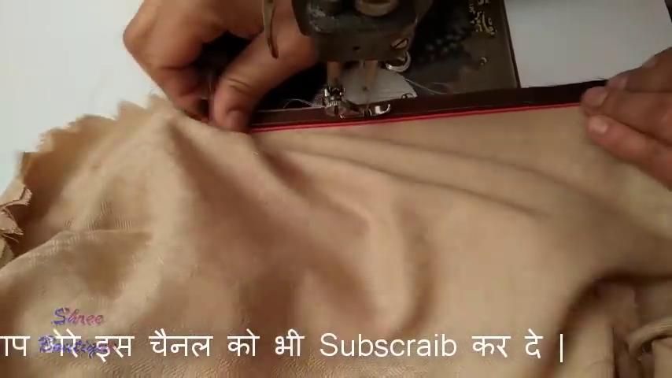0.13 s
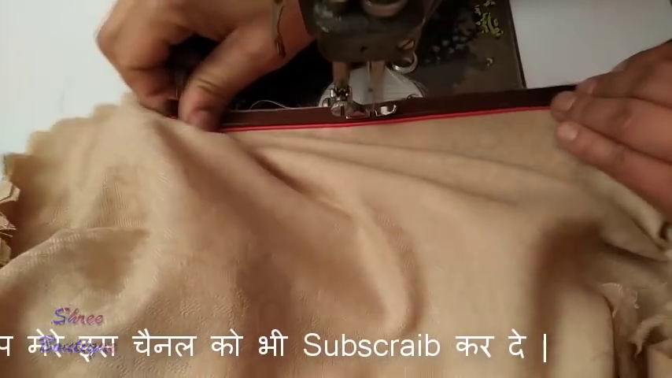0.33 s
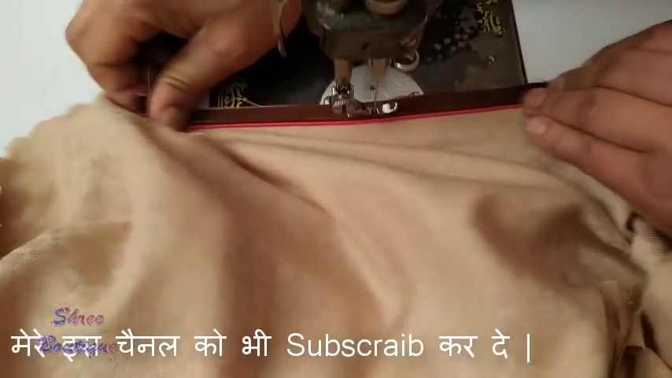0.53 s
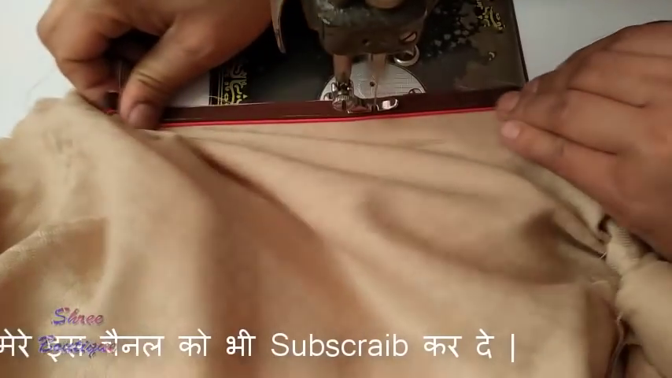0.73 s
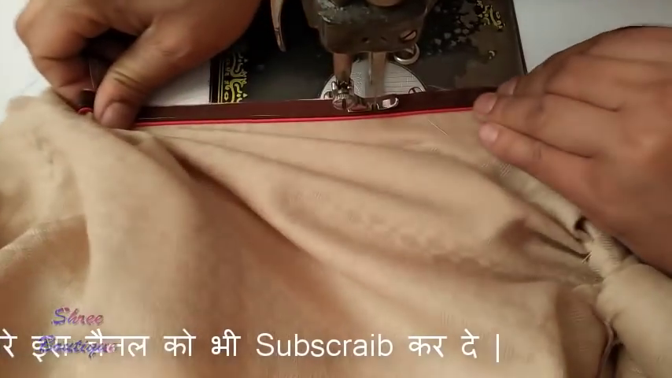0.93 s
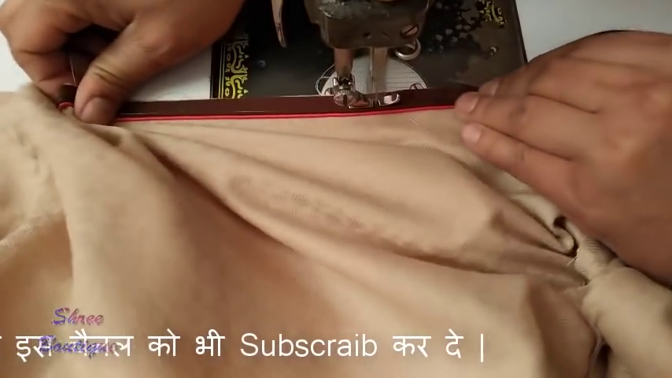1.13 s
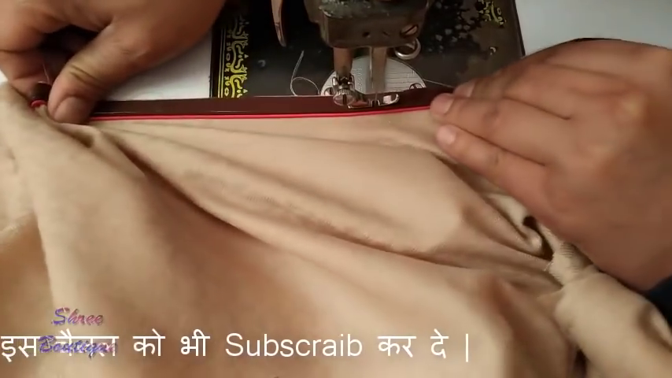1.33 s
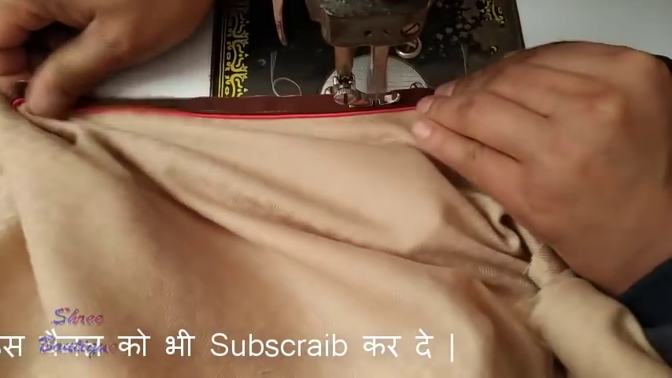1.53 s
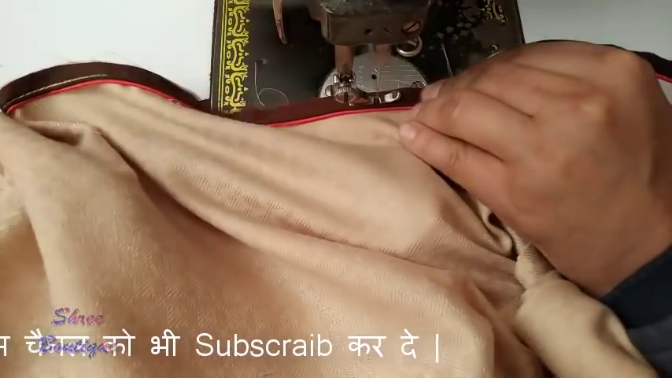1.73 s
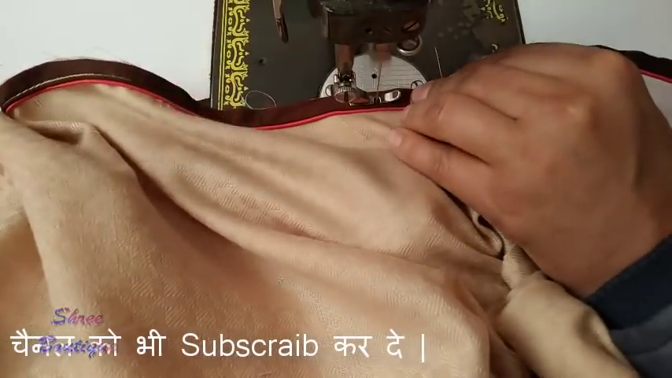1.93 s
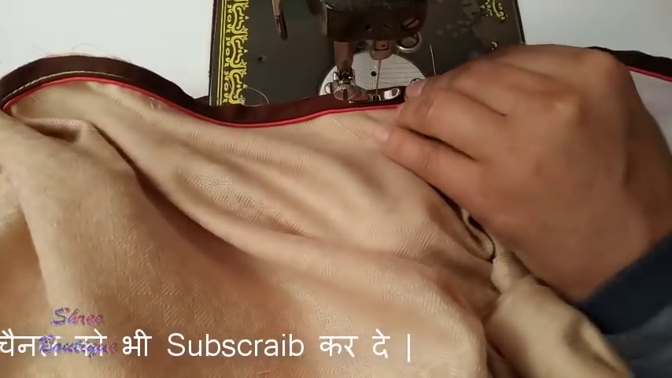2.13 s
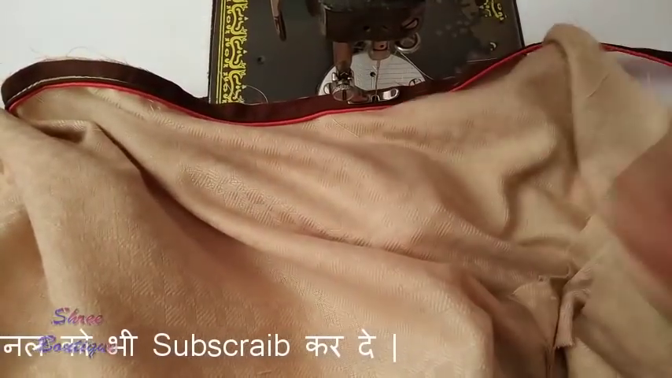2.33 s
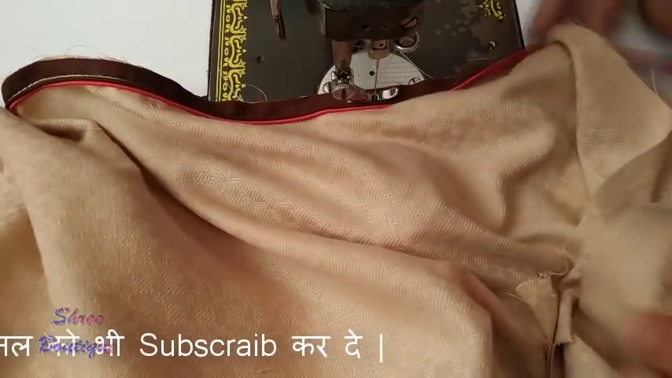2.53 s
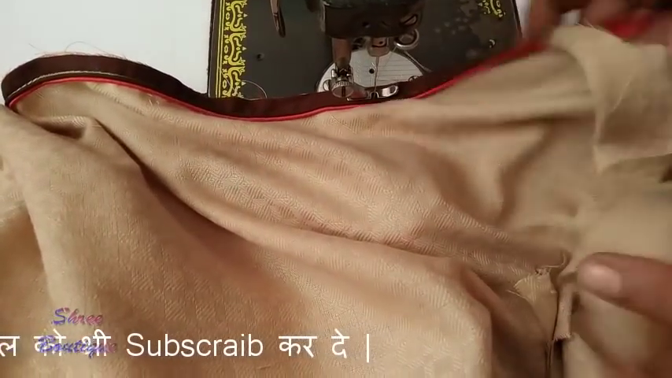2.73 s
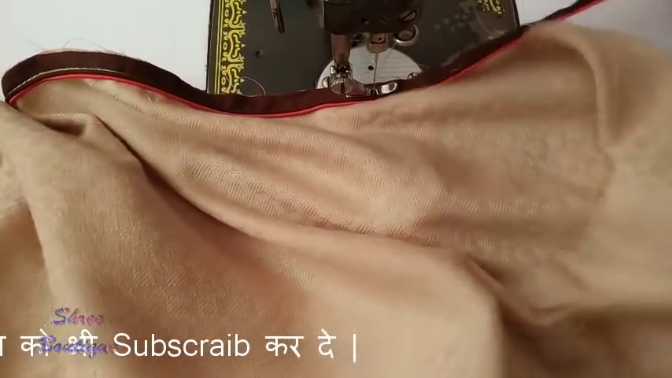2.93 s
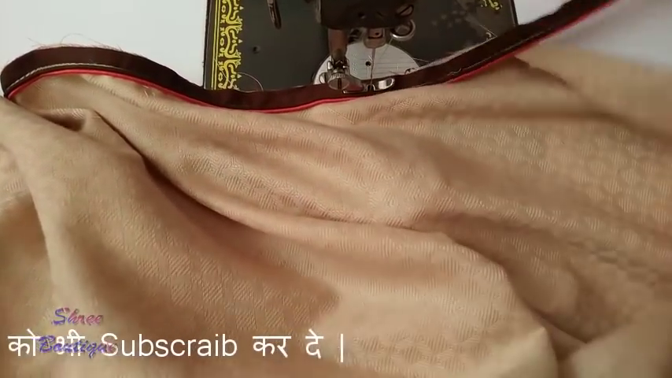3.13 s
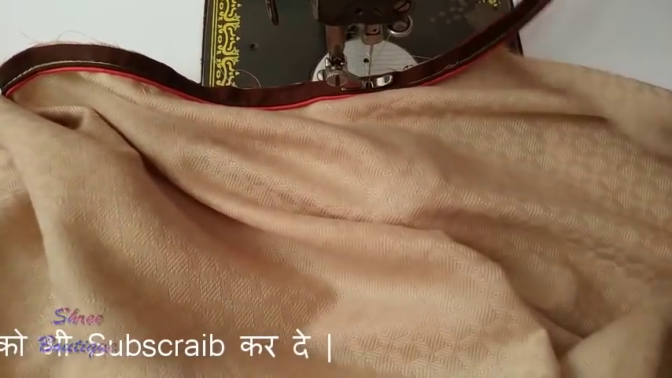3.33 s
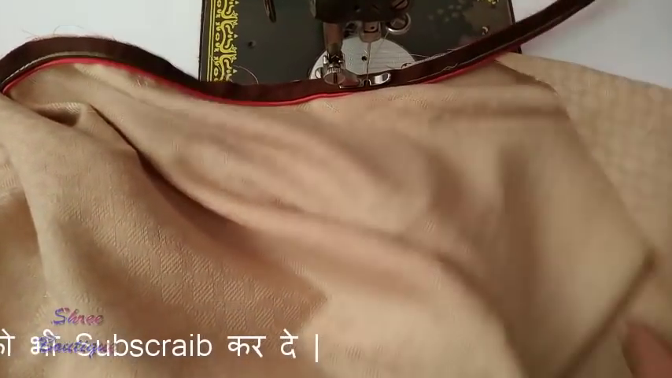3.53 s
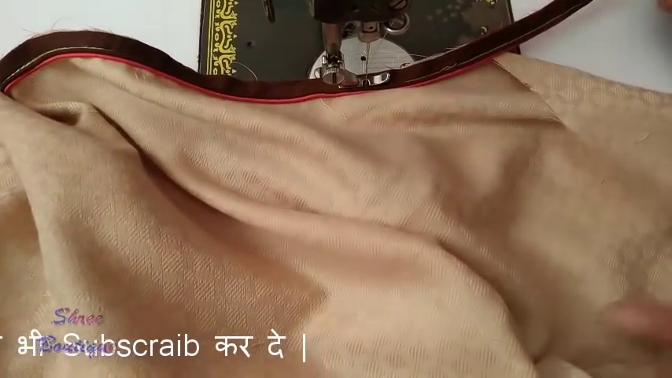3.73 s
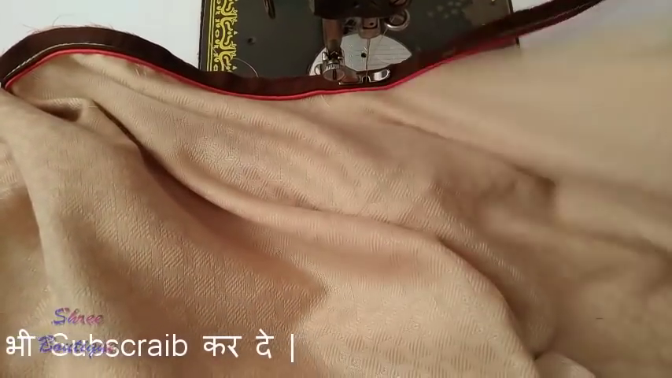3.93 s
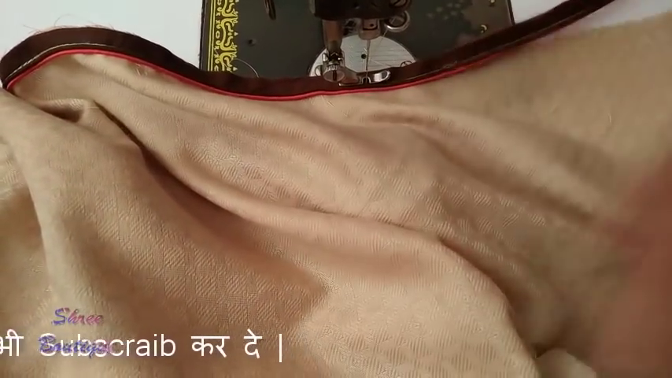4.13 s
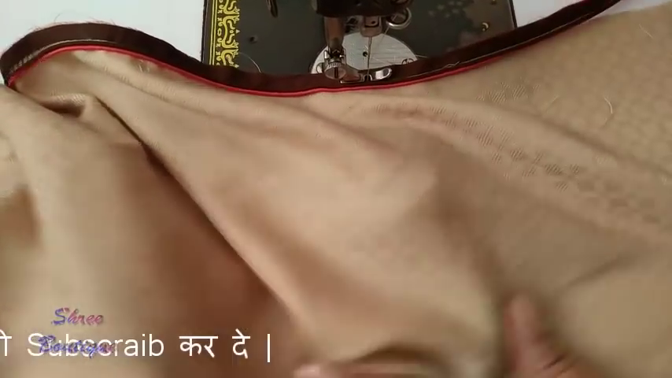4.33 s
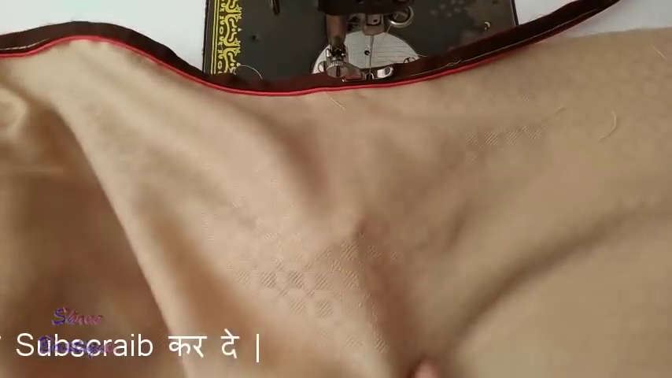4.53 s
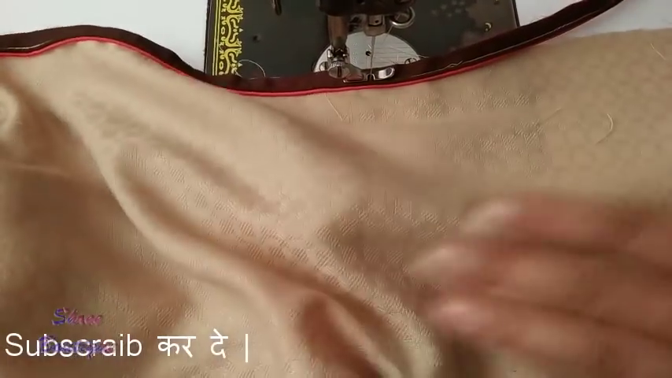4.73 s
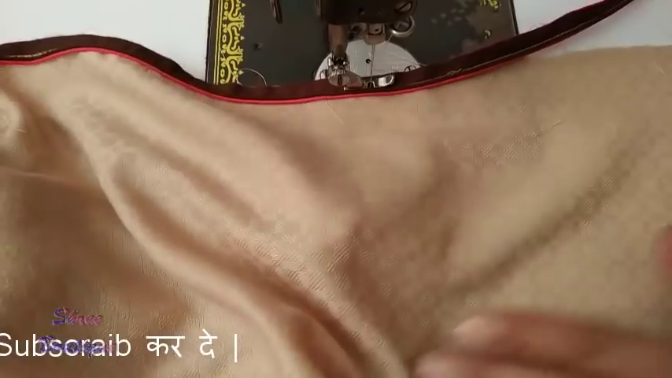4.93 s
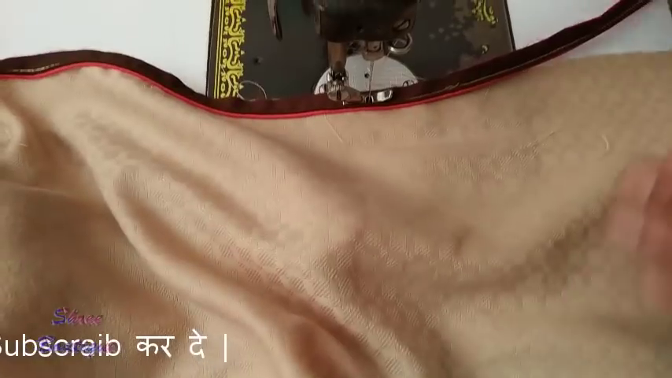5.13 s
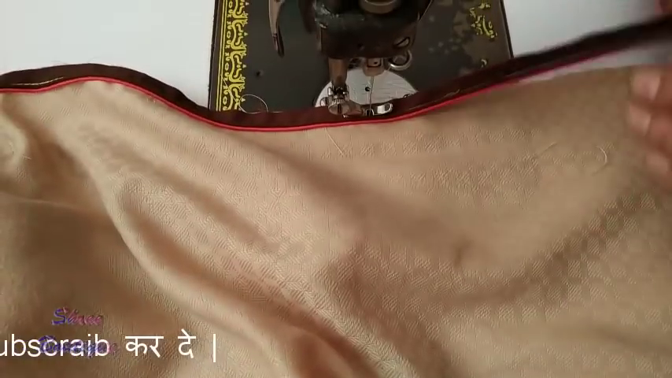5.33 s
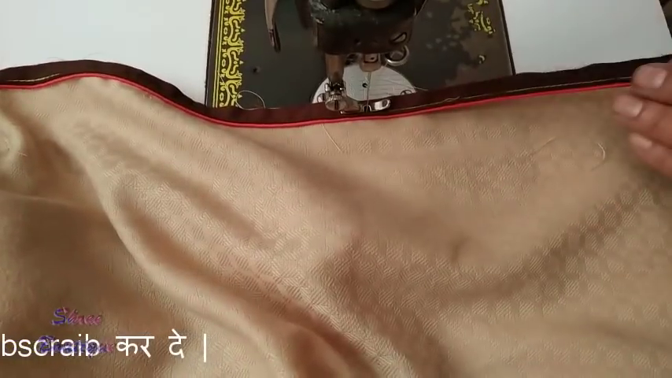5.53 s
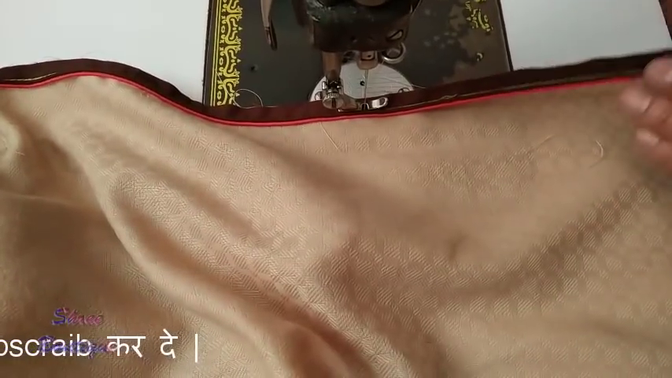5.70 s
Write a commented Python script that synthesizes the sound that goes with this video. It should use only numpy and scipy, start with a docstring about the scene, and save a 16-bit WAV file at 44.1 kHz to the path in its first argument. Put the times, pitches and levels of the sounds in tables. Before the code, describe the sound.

A sewing machine is already running fast on a wooden table in a small room, heard close in stereo. For the first 0.7 seconds, heavy wooden thuds come at over twenty per second, peaking near 0.4, beneath a broad whirr and steel rattle. From about 0.75 the drive eases: thuds give way to sharp, bright clicks and looser chatter as the speed sags, recovers briefly and falls. Between 1.55 and 2.1 it runs down in irregular metallic clacks, with two strong thuds near 1.7, and is still by 2.4. Then it is much quieter. A hand knocks at 2.5, cloth rustles softly, and fabric swishes swell around 3.5, 4.0, 4.5, 4.9 and 5.5. Table knocks fall at 4.35 and 4.9, the strongest at 5.24. Tiny steel tinks and a barely audible low-pitched hoot, mostly around 3.1-3.6 and 4.7-5.4, sit over faint room air.

```python
"""A sewing machine clatters at speed on a wooden table in a small room, coasts and stops, close to two microphone ports.
One shaft speed times the driven thuds, feed knocks, regular steel strikes and sway; blows ring decaying modes.
Whirr, rattle and clicks are shaped noise and ringing steel.
Afterwards cloth drags as swelling noise, hands knock the table, and a faint tone hoots far away."""
import sys
import numpy as np
from scipy import signal
from scipy.io import wavfile
from scipy.ndimage import uniform_filter1d

SR = 44100
rng = np.random.default_rng(int(sys.argv[2]) if len(sys.argv) > 2 else 0)


def unload_wav(signal):
    """Save mono or channel-first audio to the path in sys.argv[1] as 16-bit WAV at rate SR, clipped to [-1, 1]."""
    wavfile.write(
        sys.argv[1],
        SR,
        np.round(np.clip(np.atleast_2d(signal).T, -1, 1) * 32767).astype(np.int16),
    )


N = 258646
T = np.arange(N) / SR
FLAT = ((1, 0), (2, 0))
STEEL_GAP_S = .00014  # steel sound reaches the left port later


def gain_of(db):
    """Turns dB into amplitude."""
    return 10 ** (np.asarray(db) / 20)


def evened(x):
    """Scales a signal to rms 1."""
    return x / np.sqrt(np.mean(x ** 2) + 1e-20)


def read(points, hz):
    """Reads a spectrum table along a log frequency axis."""
    f, value = np.transpose(points)
    return np.interp(np.log(hz + 1), np.log(f + 1), value)


def curves(rows):
    """Draws each column of a time table as a curve over every sample."""
    s, *columns = np.transpose(rows)
    return [np.interp(T, s, c) for c in columns]


def train(s, db):
    """Places single samples of the given levels at the given times."""
    out = np.zeros(N)
    places = np.clip(np.round(np.asarray(s) * SR).astype(int), 0, N - 1)
    np.add.at(out, places, gain_of(db))
    return out


def fading(x, t60):
    """An envelope that jumps at each sample of x and decays by 60 dB in t60 seconds."""
    return signal.lfilter([1], [1, -1000 ** (-1 / (t60 * SR))], x)


def decaying(hz, db, t60, t):
    """One struck mode: a sine that decays by 60 dB in t60 seconds."""
    return gain_of(db - 60 * t / t60) * np.sin(2 * np.pi * hz * t)


# How alike diffuse sound is at the two ports: (frequency [Hz], likeness [-1 to 1])
PORT_LIKENESS = [(60, 0.56), (240, 1), (950, 0.32), (3770, -0.21), (15000, -0.68)]


def noise(spectrum, patchy_db, tilt=FLAT, direct=0., lag_s=0.):
    """Two-port noise of rms 1 with drifting patches; direct is the least likeness, lag_s delays the left port."""
    frames, hz = N // 256 + 5, np.fft.rfftfreq(1024, 1 / SR)
    a, b, c, d, patches = rng.standard_normal((frames, 513, 5)).T
    patches = uniform_filter1d(patches, size=12, axis=0)  # neighbouring frequencies move together
    patches = evened(uniform_filter1d(patches, size=8, axis=1))  # and drift over time
    same = np.clip(np.maximum(read(PORT_LIKENESS, hz), direct), 0, 1)[:, None]
    side = gain_of(read(tilt, hz) / 2)[:, None]
    shared, other = a + 1j * b, c + 1j * d
    lead = np.exp(2j * np.pi * hz * lag_s)[:, None]
    right = same * lead * shared + np.sqrt(1 - same ** 2) * other
    ports = np.array([shared * side, right / side])
    ports *= gain_of(read(spectrum, hz)[:, None] + patchy_db * patches)
    return evened(signal.istft(ports, nperseg=1024, noverlap=768)[1][:, :N])


# Still air in the room: (frequency [Hz], relative density [dB per Hz])
AIR_SPECTRUM = [(12, -35.5), (20, 6), (59, -18.5), (123, 1.5), (537, -12), (1640, -18), (2170, -12.5),
                (3110, -19.5), (7390, -22), (9770, -19), (15700, -40)]
AIR_DB = -61.5


def still_air():
    """Steady background air: shaped noise with slow patches."""
    return gain_of(AIR_DB) * noise(AIR_SPECTRUM, 1.8)


def room(x):
    """A short diffuse tail, alike at both ports in the bass."""
    t = T[:SR // 2]
    spectrum = [(80, -11), (220, -10), (400, 2), (16000, 0)]
    tail = noise(spectrum, 0)[:, :len(t)] * gain_of(-60 * t / 0.26)
    tail[:, :150] = 0  # gap before the first reflections
    return signal.fftconvolve(x[None], tail / np.linalg.norm(tail[0]), axes=1)[:, :N]


# Far tone: (time of peak [s], level [dB])
HOOT_SWELLS = [(2.38, -72), (3.09, -67), (3.28, -69), (3.48, -70), (3.63, -73), (4.74, -71), (5.16, -71),
               (5.44, -71)]
HOOT_HZ, HOOT_S = 810, .14


def hoots():
    """Soft swells around one pitch: a sine blended with narrow-band breath."""
    breath = signal.lfilter(*signal.iirpeak(HOOT_HZ, HOOT_HZ / 30, SR), rng.standard_normal(N))
    tone = evened(evened(breath) + 1.4 * np.sin(2 * np.pi * HOOT_HZ * T))
    return tone * sum(gain_of(db) * np.exp(-((T - s) / (HOOT_S / 2)) ** 4) for s, db in HOOT_SWELLS)


# Fine cloth rustle: (frequency [Hz], relative density [dB per Hz])
RUSTLE_SPECTRUM = [(290, -40), (500, -22), (828, -16.5), (2180, -12.5), (3500, -15), (4230, -9.5),
                   (7740, -6.5), (9340, 2), (10800, -2.5), (15700, -14)]
# Cloth dragged over the table:
# (time of peak [s], rise [s], fall [s], rustle level [dB], low rub level [dB])
CLOTH_DRAGS = [(2.3, 0.17, 0.44, -66, -49.5), (2.62, 0.36, 1, -53.5, -79), (2.9, 0.5, 0.73, -56.5, -62),
               (3.529, 0.098, 0.27, -49, -66), (3.72, 0.13, 0.034, -61.5, -77),
               (3.98, 0.15, 0.17, -47.5, -47.5), (4.14, 0.08, 0.1, -47.5, -52.5),
               (4.36, 0.19, 0.35, -59.5, -51), (4.48, 0.23, 0.33, -44, -62),
               (4.907, 0.032, 0.21, -44.5, -43.5), (5.47, 0.5, 0.52, -52, -58),
               (5.86, 0.27, 0.082, -50.5, -67.5)]
DRAG_DROP_DB = 21  # fall from the peak over one rise before or one fall after
RUB_PATCHY_DB, RUSTLE_PATCHY_DB = 2.5, 1.8


def cloth():
    """Friction swells: fine rustle with small crackles, and a low rub through the wood."""
    swells = [gain_of(-DRAG_DROP_DB * np.maximum((s - T) / rise, (T - s) / fall))
              for s, rise, fall, *_ in CLOTH_DRAGS]
    rustle, drag = gain_of(np.transpose(CLOTH_DRAGS)[3:]) @ swells
    snaps = rng.exponential(1, N) * (rng.random(N) < 220 / SR)  # about 220 a second
    crackle = evened(1 + 0.18 * fading(snaps, 0.018))
    rub_spectrum = [(8, 3.0), (30, -12.5), (60, -13.0), (120, -13.0), (20000, -50.5)]
    rub = noise(rub_spectrum, RUB_PATCHY_DB)
    return rustle * crackle * noise(RUSTLE_SPECTRUM, RUSTLE_PATCHY_DB) + drag * rub


# Grit of a hard click: (frequency [Hz], relative density [dB per Hz])
CLICK_SPECTRUM = [(470, -57), (800, -31.5), (1370, -28.5), (2040, -9), (3570, -12), (5870, -11.5),
                  (7620, -11), (8530, -7), (9420, -2), (15700, -20.5)]


def click_grit(patchy_db, **ports):
    """The bright noise inside a hard, short contact."""
    return noise(CLICK_SPECTRUM, patchy_db, **ports)


# Modes of table and machine bed: (frequency [Hz], t60 [s], relative level under a stitch thud [dB],
# under running vibration [dB], under a hand [dB])
WOOD_MODES = [(70, .25, -12, -18, -24), (107, .22, -11, -13, -16), (143, .25, .5, -14, -14),
              (155, .34, -5.5, -17, -1), (166, .25, -3, -18, -2), (185, .1, -9, -14, -8),
              (204, .32, -3.5, -17, -12), (266, .12, -9, -4, -16), (292, .13, -8, 1, -14),
              (318, .12, -9, -6, -9), (343, .17, -18, -6, -4), (398, .1, -11, 1, 0),
              (450, .11, -24, -10, -7), (530, .1, -15, -17, -11), (675, .1, -17, -16, -6),
              (845, .07, -20, -12, -22), (985, .06, -19, -13, -11)]
THUD, VIBRATION, HAND = 2, 3, 4  # level columns
RADIATES_HZ = 68  # the table radiates little below this


def ring(column, lo_hz, hi_hz, contact_s):
    """The table's modes answer one blow, peak 1; a longer contact sounds duller and the low end is thinned."""
    t = T[:SR // 2]
    out = sum(decaying(m[0], m[column], m[1], t) for m in WOOD_MODES if lo_hz < m[0] < hi_hz)
    out = np.convolve(out, np.hanning(int(max(contact_s, 0) * SR) + 3))[:len(t)]
    out = signal.lfilter(*signal.butter(2, RADIATES_HZ, "high", fs=SR), out)
    return out / abs(out).max()


def shaken(kernel, per_s, spread_db):
    """Random blows of uneven size and either sign ring the table; rms 1."""
    size = gain_of(spread_db * np.minimum(rng.exponential(1, N), 4))
    blows = size * (rng.random(N) < per_s / SR) * rng.choice([-1., 1.], N)
    return evened(signal.oaconvolve(blows, kernel)[:N])


# Hands on the table: (time [s], level [dB], relative level of upper modes [dB],
# relative level of nail tick [dB], contact [s], settling [s])
HAND_KNOCKS = [(2.488, -33.5, -4, -24, .002, .012), (2.555, -53, 6, -18, .004, .04),
               (2.68, -51, 4, -33, .0023, .05), (3.47, -46, -22, -40, .004, .02),
               (3.661, -45.5, -9, -40, .0015, .004), (3.917, -49, -12, -40, .0034, .006),
               (3.99, -53, 3, -33, .004, .02), (4.349, -35.5, -8, -40, .0015, .005),
               (4.4, -50, -3, -40, .001, .027), (4.465, -46, -9, -23, .0014, .06),
               (4.8985, -34.5, -4, -22, .003, .002), (4.9055, -34, -2, -14, .0012, .003),
               (5.238, -26, -4, -11, .002, .002), (5.438, -53, -1, -2, .001, .006),
               (5.752, -53, -3, 2, .001, .006)]
AFTER_DB = -14  # small blows while a hand settles
TICK_PATCHY_DB = 1.5


def hands():
    """Each hand rings low and upper wood modes, then settles in small random blows one about every millisecond."""
    out = np.zeros(N)
    for s, db, upper_db, _, contact_s, settle_s in HAND_KNOCKS:
        low = ring(HAND, 130, 230, contact_s)
        blow = low + gain_of(upper_db) * ring(HAND, 230, SR, contact_s / 2)
        after = gain_of(AFTER_DB) * rng.standard_normal(80) * (np.arange(80) < settle_s * 1000)
        spaced = np.kron(after, np.eye(1, SR // 1000)[0])
        blow = blow + signal.oaconvolve(blow, spaced)[:len(blow)]
        part = out[round(s * SR):][:len(blow)]
        part += gain_of(db) * blow[:len(part)]
    return out


def nail_ticks():
    """Nails on the table: a short bright snap and a softer, longer noise tail."""
    s, db, _, tick_db, *_ = np.transpose(HAND_KNOCKS)
    nails = train(s, db + tick_db)
    snap, tail = fading(nails, .005), gain_of(-10) * fading(nails, .13)
    tail_spectrum = [(150, -25), (600, 10), (1200, 6.0), (4000, -3.0), (9000, -8), (16000, -20)]
    return snap * click_grit(0, direct=0.7) + tail * noise(tail_spectrum, TICK_PATCHY_DB)


# A small steel part tinks as the cloth tugs it: (time [s], level [dB])
TINK_BLOWS = [(2.3341, -47.5), (2.6145, -53), (2.626, -47), (3.2395, -54), (5.3438, -51)]
TINK_HZ, TINK_T60_S = 2090, 0.017


def tinks():
    """One short steel mode, struck lightly."""
    mode = decaying(TINK_HZ, 0, TINK_T60_S, T[:4000])
    return signal.oaconvolve(train(*np.transpose(TINK_BLOWS)), mode)[:N]


# Running machine: (time [s], whirr level [dB], table vibration level [dB], clatter level [dB])
RUN_LEVELS = [(0, -21.5, -21, -36), (.2, -24.5, -20.5, -29), (.45, -26.5, -20.5, -32),
              (.8, -22.5, -23, -21.5), (1.15, -23, -25, -21.5), (1.35, -20.5, -25, -22),
              (1.55, -23, -27, -27), (1.7, -25.5, -28.5, -34), (2.05, -30.5, -32.5, -14),
              (2.13, -34.5, -44.5, -7), (2.22, -48, -55.5, -22), (2.3, -54, -65, -26),
              (2.45, -64, -71, -66)]


def running(x):
    """Fades to silence as the machine comes to a stand."""
    return x * np.clip((RUN_LEVELS[-1][0] - T) * 20, 0, 1)


# Main shaft, one turn a stitch: (time [s], speed [turns per second])
SHAFT_SPEED = [(0, 20.5), (.17, 21.21), (.35, 27.52), (.45, 25.23), (.63, 22.17), (.8, 21.77), (1.0, 13.81),
               (1.2, 18.74), (1.45, 17.52), (1.6, 13.91), (1.9, 9.55), (2.1, 7.05), (2.4, .85)]
FIRST_TURN = .435  # share of a turn at the start
DRIVEN_TO_S, EASED_S = .73, .95  # hard drive ends; shake has eased


def turns():
    """Turns of the main shaft counted up to every sample."""
    return FIRST_TURN + np.cumsum(curves(SHAFT_SPEED)[0]) / SR


def passes(share):
    """The moments at which the shaft passes a share of its turn."""
    s = T[1:][np.diff(np.floor(turns() - share)) > 0]
    return s[s < RUN_LEVELS[-1][0]]


def hard_drive():
    """One while driven hard, easing to zero as the machine runs freely."""
    return np.interp(T, [DRIVEN_TO_S, EASED_S], [1, 0])


SWAY_DRIVEN_DB, SWAY_FREE_DB, SWAY_TO_S = -35.5, -38, 1.73  # the sway starts to fade at the last


def sway():
    """The stand sways once a turn when driven, then twice: two sines locked to the shaft."""
    driven = hard_drive()
    out = driven * gain_of(SWAY_DRIVEN_DB) * np.sin(2 * np.pi * turns())
    out += (1 - driven) * gain_of(SWAY_FREE_DB) * np.sin(4 * np.pi * turns())
    return out * np.clip((SWAY_TO_S - T) * 10 + 1, 0, 1)


FEED_AT, FEED_DB = .42, 5.5  # share of the turn; level over the vibration
SHAKE_DRIVEN_DB, SHAKE_FREE_DB, BED_DRIVEN_DB = -6.5, -15, -2  # over the vibration


def vibration():
    """Dense random blows shake bed and table; the feed knocks the bed once a turn as the hard drive eases."""
    _, vibration_db, _ = curves(RUN_LEVELS)
    driven = hard_drive()
    bed, feed = ring(VIBRATION, 68, SR, .0002), passes(FEED_AT)
    knocks = (1 - driven) * train(feed, FEED_DB + 1.6 * rng.standard_normal(len(feed)))
    hum = gain_of(BED_DRIVEN_DB * driven) * shaken(bed, per_s=450, spread_db=2.5)
    hum += signal.oaconvolve(knocks, bed)[:N]
    shake_db = SHAKE_FREE_DB + (SHAKE_DRIVEN_DB - SHAKE_FREE_DB) * driven
    hum += gain_of(shake_db) * shaken(ring(THUD, 68, 230, .0009), per_s=600, spread_db=1)
    return running(gain_of(vibration_db) * hum)


# Looser thuds as the machine runs down: (time [s], peak level [dB])
LOOSE_THUDS = [(.7523, -13.5), (1.6985, -10.5), (1.7332, -12), (1.829, -24), (2.05, -26)]
THUD_DB, THUD_SPREAD_DB = -5.2, .6


def thuds():
    """A blow at the top of each driven turn, then looser ones, rings the wood."""
    tops = passes(0)[passes(0) < DRIVEN_TO_S]
    blows = train(tops, THUD_DB + THUD_SPREAD_DB * rng.standard_normal(len(tops)))
    blows += train(*np.transpose(LOOSE_THUDS))
    return signal.oaconvolve(blows, ring(THUD, 68, SR, .0007))[:N]


# Where the machine stands: (frequency [Hz], left minus right [dB])
MACHINE_TILT = [(800, 0), (2400, -5.5), (5000, 4), (9000, 2), (13000, 0.5)]


def rattle(hits):
    """Covers and links rattle as hard as the table vibrates, with a burst at each steel hit."""
    _, vibration_db, _ = curves(RUN_LEVELS)
    spectrum = [(400, -23.0), (700, -6.5), (950, -1.5), (1400, -12.0), (2500, -12.0), (5000, -45.5)]
    bursts = 1 + 2.2 * fading(hits, 0.022)
    return running(gain_of(vibration_db - 13) * bursts * noise(spectrum, 1.9, MACHINE_TILT))


# Shaft whirr: (frequency [Hz], relative density [dB per Hz])
WHIRR_SPECTRUM = [(290, -41.5), (500, -5), (1120, -17.5), (1390, -3.5), (1560, -11.5), (2590, -7),
                  (3930, -8), (6510, -7), (7740, -8.5), (8820, 0.5), (13800, -17.5), (15700, -20)]
# Steel parts that ring in the whirr: (frequency [Hz], width [Hz], level over whirr [dB])
WHIRR_RINGS = [(2140, 49, -20.5), (2616, 15.9, -19), (6655, 120, -20.5)]


def whirr(strikes, loudest):
    """Broad shaft noise with narrow resonances whose noise drive surges at the strikes."""
    out = noise(WHIRR_SPECTRUM, 1.8, MACHINE_TILT, direct=.2, lag_s=STEEL_GAP_S)
    surges = strikes + loudest * (T > COAST_S) / loudest.max()
    drive = rng.standard_normal((2, N)) * (1 + 5 * fading(surges, 0.06))
    for hz, width, db in WHIRR_RINGS:
        out = out + gain_of(db) * evened(signal.lfilter(*signal.iirpeak(hz, hz / width, SR), drive))
    return running(gain_of(curves(RUN_LEVELS)[0]) * out)


# Steel parts that strike in every turn: (share of the turn, level over clatter [dB])
TURN_STRIKES = [(.23, -2.5), (.57, 0), (.93, -4)]
STRIKE_SPREAD_DB, STRIKE_JITTER_S = 2, .0007
COAST_S = 1.6  # regular strikes and small ticks end


def regular_strikes():
    """Shaft-timed steel blows, slightly uneven in time and level."""
    s, db = np.transpose([(s, db) for share, db in TURN_STRIKES for s in passes(share) if s < COAST_S])
    late, loud = rng.standard_normal((len(s), 2)).T
    return train(s + STRIKE_JITTER_S * late, db + STRIKE_SPREAD_DB * loud)


# What the steel rings with when struck: (frequency [Hz], relative level [dB], t60 [s])
STEEL_MODES = [(4730, -13, .013), (5930, -10, .02), (6680, -2.5, .03), (8340, -5, .03), (8580, -2, .03),
               (8830, -2, .035), (9480, -9, .015), (10100, -1.5, .025), (12100, -16, .02)]
# Where the clicks come from: (frequency [Hz], left minus right [dB])
CLICK_SIDE = [(2700, -6), (5000, 4), (6700, 4), (8700, -4), (13000, -4)]
STEEL_DB, TICKS_PER_TURN, TICKS_DB = 4, 7, -3.5  # ring gain; mean tick count; tick level over whirr


def clicks(strikes, loudest):
    """Strikes, loud clicks and small ticks snap as bright grit, and noise bursts excite the steel modes."""
    whirr_db, _, clatter_db = curves(RUN_LEVELS)
    tick_db = whirr_db + TICKS_DB + 3.5 * np.minimum(rng.exponential(1, N), 3)
    ticks = gain_of(tick_db) * (rng.random(N) < TICKS_PER_TURN * curves(SHAFT_SPEED)[0] / SR)
    hits = gain_of(clatter_db) * strikes + loudest
    snap = fading(hits + ticks * (T < COAST_S), .0055)
    snap = uniform_filter1d(snap, size=50, origin=20)  # rounds the attack over about a millisecond
    ports = dict(tilt=CLICK_SIDE, lag_s=STEEL_GAP_S)
    grit = click_grit(2, direct=.6, **ports)
    modes = sum(decaying(hz, db, t60, T[:6000]) for hz, db, t60 in STEEL_MODES)
    white = noise(FLAT, 0, direct=.8, **ports)
    rung = signal.oaconvolve(snap * white, modes[None] / np.linalg.norm(modes), axes=1)[:, :N]
    grit_level = gain_of(-2) * snap + gain_of(-17) * fading(hits, 0.18)
    return grit_level * grit + gain_of(STEEL_DB) * rung


# The loudest single steel clicks: (time [s], level [dB])
LOUD_CLICKS = [(.0044, -6), (0.137, -9.5), (0.334, -17.5), (0.457, -16), (0.627, -12), (0.745, -16.5),
               (0.766, -11), (.824, -11.5), (0.856, -11), (0.879, -14), (0.898, -12), (0.916, -14.5),
               (0.964, -17), (1.001, -11), (1.046, -16.5), (1.073, -11.5), (1.152, -10), (1.167, -13),
               (1.1877, -12), (1.238, -19), (1.296, -25), (1.5648, -8.5), (1.639, -17), (1.666, -8.5),
               (1.7158, -7.5), (1.7451, -10), (1.782, -14.5), (1.803, -19), (1.8344, -12), (1.9046, -12.5),
               (1.9343, -9.5), (2.0187, -11), (2.0579, -11.5), (2.1386, -24), (2.221, -20.5), (2.2733, -33)]


def steel():
    """Whirr, rattle and clicks share the same regular strikes and loud single hits."""
    strikes, loudest = regular_strikes(), train(*np.transpose(LOUD_CLICKS))
    return whirr(strikes, loudest) + rattle(strikes + loudest) + clicks(strikes, loudest)


PORT_GAP_S = .00018  # table and far tone reach the left port later


def scene():
    """Wood and far tone with the room, then steel, cloth, nails and still air."""
    dry = hoots() + hands() + sway() + vibration() + thuds()
    wet = gain_of(-8) * room(dry)
    ports = np.array([np.interp(T - PORT_GAP_S, T, dry), dry])
    return ports + wet + still_air() + cloth() + nail_ticks() + tinks() + steel()


DULL_HZ, EDGE_HZ = 15800, 16800


def record(dry):
    """Dulls the very top by 28 dB, then applies the band limit."""
    dull, edge = (signal.firwin(511, hz, window=("kaiser", 9), fs=SR) for hz in (DULL_HZ, EDGE_HZ))
    response = dull + gain_of(-28) * (edge - dull)
    return signal.oaconvolve(dry, response[None], "same")


dry = scene()
out = record(dry)
unload_wav(out)
```